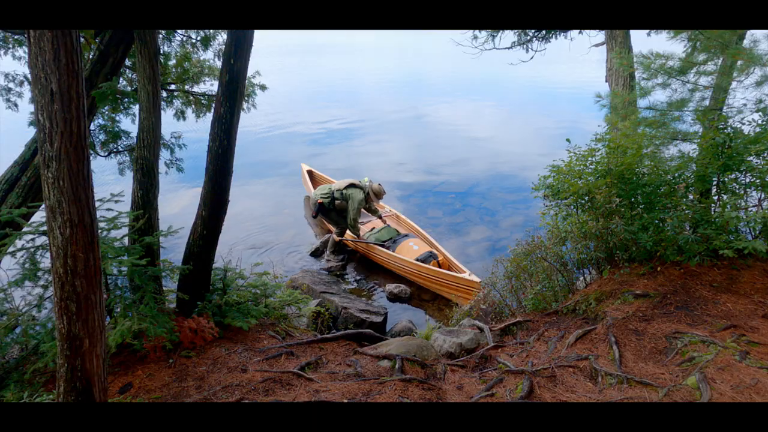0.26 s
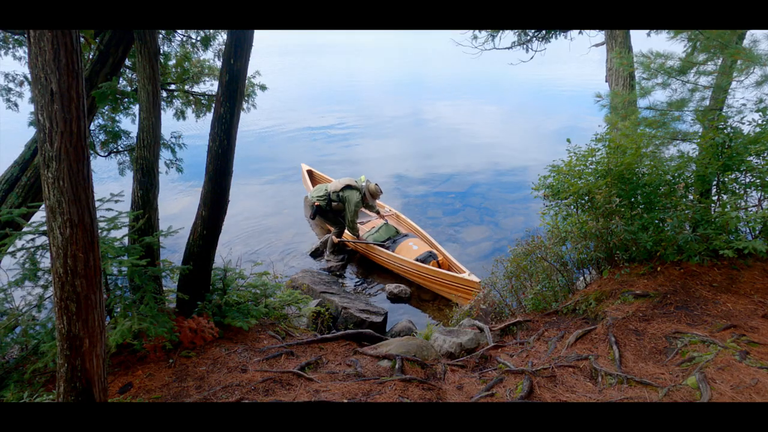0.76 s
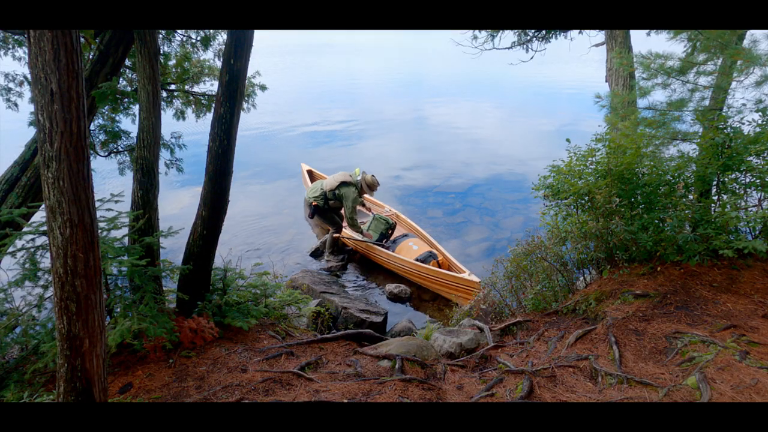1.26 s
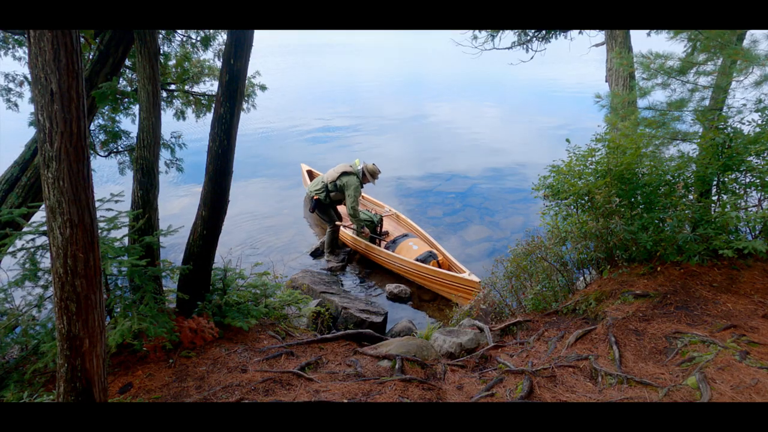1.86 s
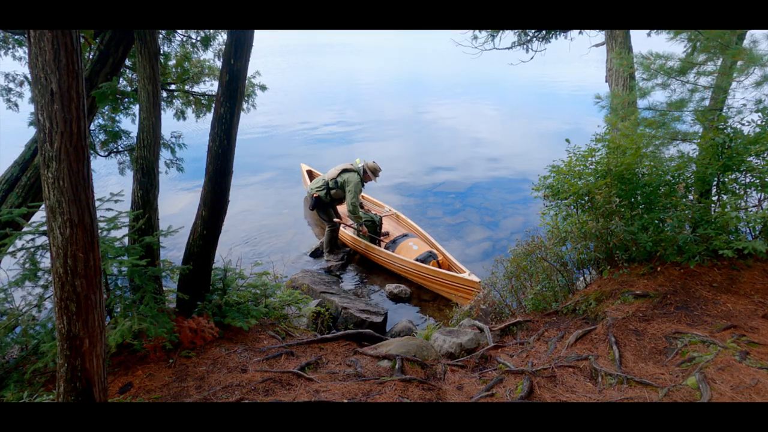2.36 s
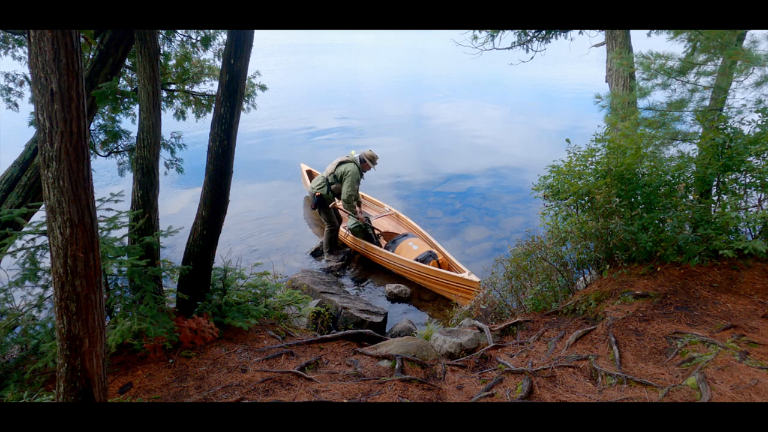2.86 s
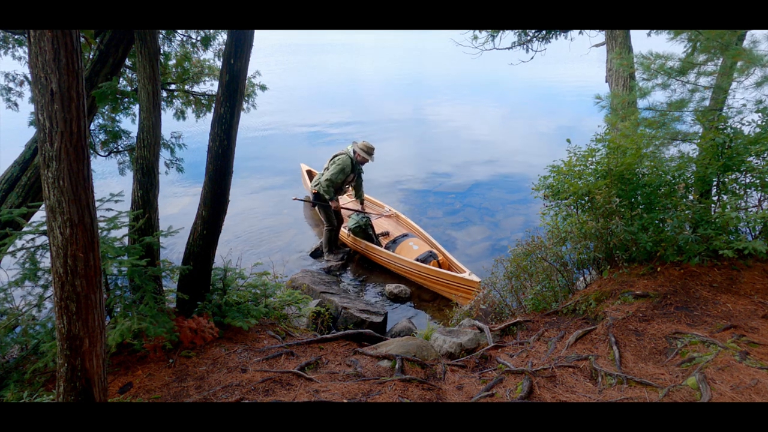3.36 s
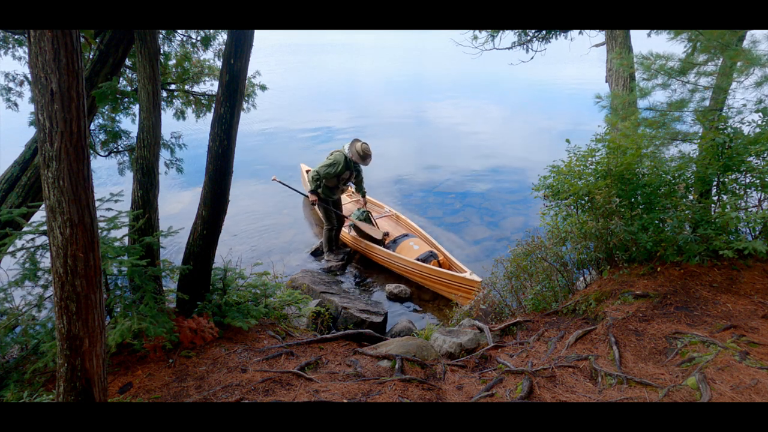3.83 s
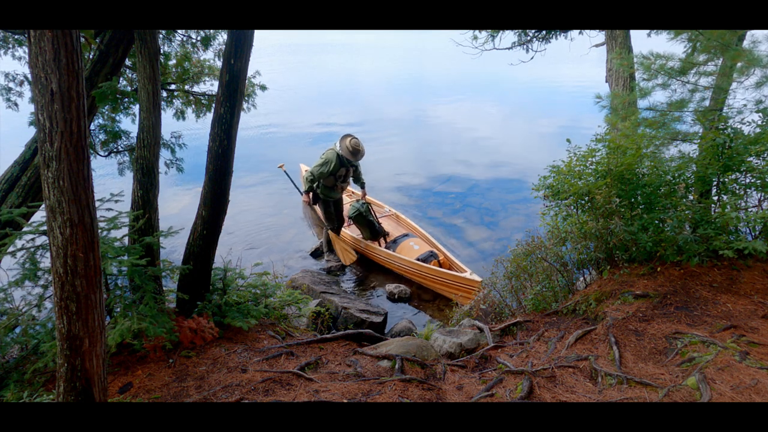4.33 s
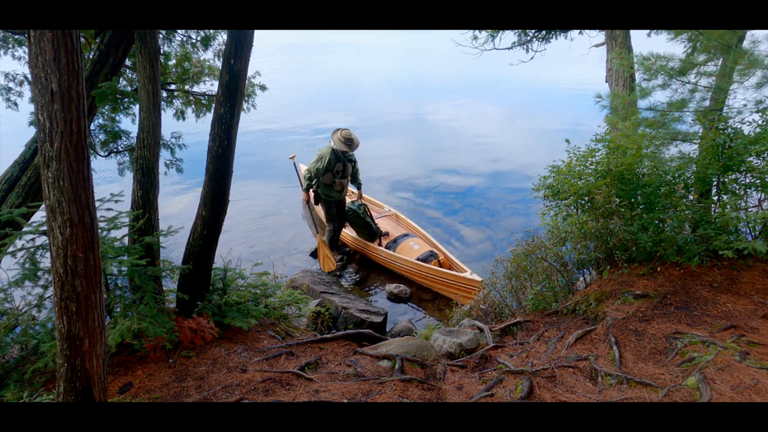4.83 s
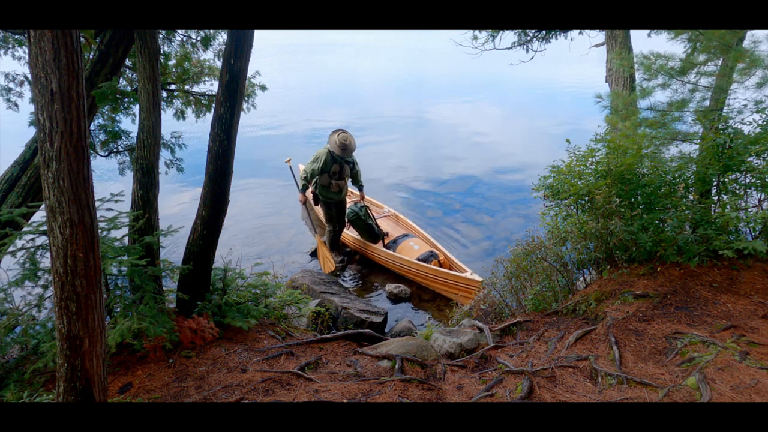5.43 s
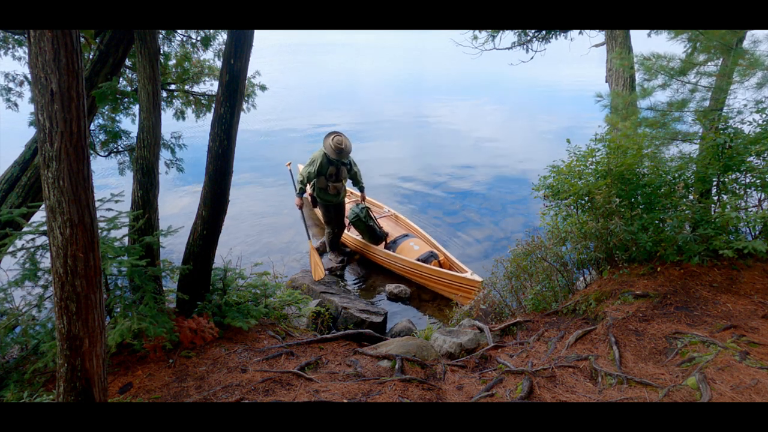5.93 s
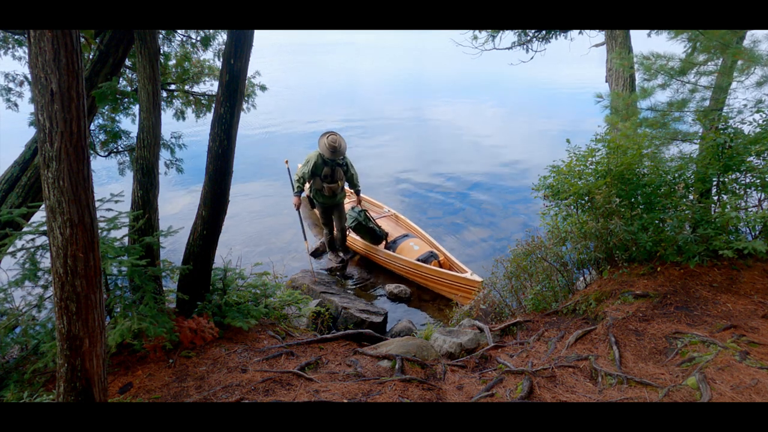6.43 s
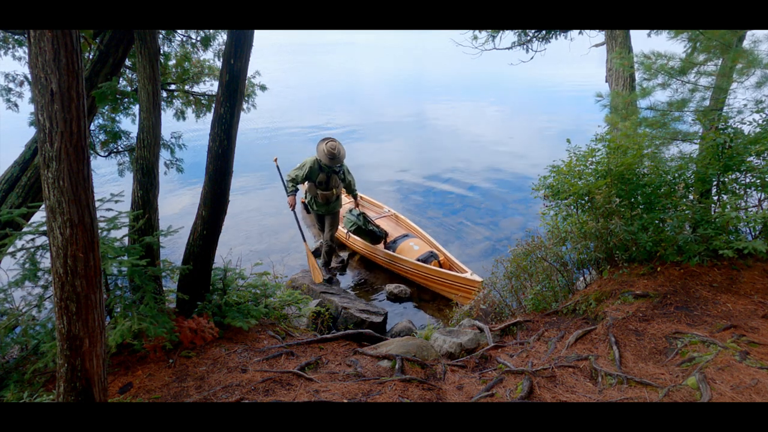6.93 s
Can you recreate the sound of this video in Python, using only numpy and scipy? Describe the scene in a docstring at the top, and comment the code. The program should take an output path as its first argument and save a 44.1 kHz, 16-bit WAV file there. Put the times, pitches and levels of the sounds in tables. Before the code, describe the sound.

A soft pack drags and thuds over the ribs of a wooden canoe, hard knocks ring the hull, buckles click, then a paddle taps stone by a quiet lake.

```python
"""By the rocks of a calm lake, a nylon pack is dragged over the ribs of a wooden canoe.
Knocks and bumps are bending-wave chirps that ring the hull; rubbing is stick-slip grains through that ring.
A paddle on stone, buckles and drips are damped sines; nylon, thin whistling and ticks are shaped noise.
Behind: a cut from one place's faint hiss to another's far rush, low rumble puffs, one microphone thump."""
import sys
import numpy as np
from scipy import signal
from scipy.fft import rfft, irfft, next_fast_len
from scipy.io import wavfile
from scipy.ndimage import map_coordinates

SR = 44100
rng = np.random.default_rng(int(sys.argv[2]) if len(sys.argv) > 2 else 0)


def put_to_file(sound):
    """Save the sound as 16-bit audio at rate SR, in the file named by the first command-line argument."""
    columns = np.atleast_2d(sound).T  # one column per channel
    safe = np.clip(columns, -1, 1)
    whole_steps = np.round(safe * 32767)
    wavfile.write(sys.argv[1], SR, whole_steps.astype(np.int16))


N = 317079
T = np.arange(SR // 2) / SR  # time axis of a short sound, s
HZ = np.fft.rfftfreq(SR, 1 / SR)


def amp(db):
    """Decibels to gain."""
    return 10 ** (np.asarray(db) / 20)


def unit(x):
    """Scale to rms 1."""
    return x / np.sqrt(np.mean(x ** 2) + 1e-20)


def along(points, hz):
    """Interpolate (Hz, value) points on a log frequency axis."""
    f, v = np.transpose(points)
    return np.interp(np.log(hz + 1), np.log(f + 1), v)


def curve(rows):
    """(s, value) rows as one value per sample."""
    return np.interp(np.arange(N) / SR, *np.transpose(rows))


def wobble(rate):
    """A smooth random curve, rate knots a second."""
    knots = rng.standard_normal(int(N * rate / SR) + 4)
    return map_coordinates(knots, [np.arange(N) * rate / SR])


def noise_burst(t60):
    """White noise dying by 60 dB in t60 seconds."""
    return amp(-60 * T / t60) * rng.standard_normal(len(T))


def filtered(x, response):
    """x times a complex response of frequency."""
    m = next_fast_len(N + SR // 2)
    return irfft(rfft(x, m) * response(np.fft.rfftfreq(m, 1 / SR)), m)[..., :N]


def coloured(x, spectrum):
    """A steady sound filtered by (Hz, dB) points, at rms 1."""
    return unit(filtered(x, lambda hz: amp(along(spectrum, hz))))


def struck(x, db):
    """A short sound through the causal minimum-phase filter with these dB on the HZ grid."""
    cepstrum = irfft(np.log(amp(db)))
    cepstrum[1:SR // 2] *= 2
    cepstrum[SR // 2 + 1:] = 0
    return irfft(rfft(x, SR) * np.exp(rfft(cepstrum)))[:len(T)]


def add(track, s, sound):
    """Mix a sound in at time s."""
    room = track[round(s * SR):][:len(sound)]
    room += sound[:len(room)]


def at_level(x, db):
    """Give a hit the energy of 50 ms at this rms level."""
    return amp(db) * x * np.sqrt(.05 * SR / np.sum(x ** 2))


def ring(modes, scatter_db, detune):
    """Damped sines, at new strengths and slightly new pitches for every blow."""
    hz, db, t60 = np.transpose(modes)[:, :, None]
    size, pitch = rng.standard_normal((2, len(modes), 1))
    sign = (-1) ** np.arange(len(modes))[:, None]
    decay = amp(db + scatter_db * size - 60 * T / t60)
    sines = np.sin(2 * np.pi * hz * (1 + detune * pitch) * T)
    return np.sum(sign * decay * sines, axis=0)


def grains(rate, spread_db):
    """Tiny slips at random moments and of random sizes, at rms 1."""
    chance, size, sign = rng.random(N), rng.standard_normal(N), rng.choice([-1, 1], N)
    return unit((chance < rate / SR) * amp(spread_db * size) * sign)


def swells(start, length, db, rise_db_per_s, fall_db_per_s):
    """Gain of overlapping gestures: each rises to its level, holds for its length and falls away."""
    t = np.arange(0, N + 64, 64)[:, None] / SR
    rise_db = rise_db_per_s * np.maximum(start - t, 0)
    fall_db = fall_db_per_s * np.maximum(t - start - length, 0)
    each = amp(db - rise_db - fall_db)
    return curve(np.c_[t, np.linalg.norm(each, axis=1)])


def pair(spectrum, alike):
    """Stereo noise of rms 1 with a given likeness of the two sides."""
    turn = lambda hz: np.arccos(np.clip(along(alike, hz), -1, 1)) / 2
    share = lambda hz: amp(along(spectrum, hz)) * [np.cos(turn(hz)), np.sin(turn(hz))]
    mid, side = filtered(rng.standard_normal((2, N)), share)
    return unit(np.array([mid + side, mid - side]))


# Spectrum of a blow on the planking. Each row: frequency in Hz, relative level in dB.
PLANK = [(40, -22), (100, -3.5), (180, 0.5), (300, 4), (400, -4.5), (500, -7), (780, -14.5), (1000, -7.5),
         (1300, -14), (1650, -25.5), (2000, -29.5), (2500, -27), (5200, -37), (7500, -50.5), (14000, -67)]
# Hard gear on the hull. Each row: start in seconds, level in dB, knock in dB, lower edge of the knock in Hz,
# crack in the treble in dB, travel time of the bending wave at 250 Hz in seconds, ring gain in dB,
# pitch of the struck panel in Hz, place along the hull 0-1.
KNOCKS = [(1.9121, -24, -2.5, 610, 1, .021, -2, 161, 0.5), (2.113, -22, 5, 540, 9.5, 0.018, 2, 190, 0.3),
          (2.738, -21, 9.5, 500, 5, 0.003, -3.5, 171.4, 0.36),
          (3.154, -22.5, 12, 1100, 19, 0.00553, 1.5, 296, .085),
          (3.6377, -33.5, 8.5, 1010, 0.5, 0.0047, 2, 277, 0.01)]
# Soft pack or boot on the ribs. Each row: start in seconds, level in dB, hardness in dB, panel pitch in Hz.
BUMPS = [(1.257, -42, 7, 234), (1.409, -31.5, 8.5, 309), (1.433, -35, 5, 238), (1.468, -25, 1, 227.6),
         (1.498, -29.5, -1, 303), (1.516, -29.5, 1, 222), (1.547, -27, -28.5, 231.4),
         (1.574, -35, 5.5, 330), (1.603, -29.5, 9.5, 258), (1.635, -31, 1, 360.6), (1.674, -29.5, 2.5, 268),
         (1.722, -29, 0.5, 229), (1.747, -35, 6.5, 298), (1.774, -35, -16, 142), (1.819, -34.5, -1.5, 185),
         (1.874, -33, 2.5, 314), (1.927, -24, -17.5, 164.3), (1.958, -29.5, -23, 218),
         (2.026, -40, -18, 128), (2.413, -34.5, -21, 141.6), (3.47, -52.5, -32, 200),
         (5.474, -49.5, -19, 244), (5.82, -51.5, -14, 154)]
BUMP_EDGE_HZ, BUMP_MUFFLE_DB = 570, -1.5  # lower edge of the knock; padding's effect on the crack
BUMP_TRAVEL_S, BUMP_RING_DB = 0.006413, 4  # travel time at 250 Hz; ring gain
BUMP_DAMPING_DB_PER_S = 106.5  # the padding stays on the planks; adds to their own decay
KNOCK_PANEL_DB, BUMP_PANEL_DB = -45, -35  # panel note before the ring gain
PANEL_T60_S = 0.16  # without padding


def knocks():
    """Each blow sends a falling chirp through the planks; the struck panel and the whole hull ring behind."""
    out = np.zeros(N)
    hits = [(*row, KNOCK_PANEL_DB, 0) for row in KNOCKS]
    for s, db, hard_db, hz in BUMPS:
        hits.append((s, db, hard_db, BUMP_EDGE_HZ, hard_db + BUMP_MUFFLE_DB, BUMP_TRAVEL_S, BUMP_RING_DB,
                     hz, rng.random(), BUMP_PANEL_DB, BUMP_DAMPING_DB_PER_S))
    for s, db, knock_db, knock_hz, crack_db, travel, ring_db, panel_hz, place, panel_db, damping in hits:
        hardness = along([(330, 0), (knock_hz, knock_db), (1200, knock_db), (1600, crack_db)], HZ)
        panel = amp(panel_db - 60 * T / PANEL_T60_S) * np.cos(2 * np.pi * panel_hz * T)
        ringing = signal.fftconvolve(panel + hull_ring(place), bending_wave(travel))[:len(T)]
        wave = contact(travel) + amp(ring_db - damping * T) * ringing
        add(out, s, at_level(struck(wave, along(PLANK, HZ) + hardness), db))
    return out


def contact(travel, grit_db=-21, grit_t60=0.034, grit_rise=0.00054):
    """A blow's lows are one clean bending wave; its treble is a brief crunch arriving with the wave's front."""
    clean = 1 / (1 + (HZ / 2800) ** 4)
    front = np.exp(-2j * np.pi * HZ * travel * np.sqrt(250 / 2800))
    grit = amp(grit_db) * (1 - np.exp(-T / grit_rise)) * noise_burst(grit_t60)
    lows = clean * rfft(bending_wave(travel), SR)
    return irfft(lows + (1 - clean) * front * rfft(grit, SR))[:len(T)]


def bending_wave(travel):
    """A pulse spread by a thin plate: speed grows with the root of frequency, so the treble arrives first."""
    return irfft(np.exp(-4j * np.pi * travel * np.sqrt(250 * HZ)))[:len(T)]


# Hull modes, by number of half-waves along the boat. Each row: frequency in Hz, relative level in dB.
HULL = [(134, 0.5), (167, -1), (189, 1), (230, -1), (265, 0), (304, -3.5), (361, -0.5), (400, 4),
        (450, 0.5), (565, 2.5), (646, 6), (705, 4), (813, -1.5), (900, 0), (958, -1), (1015, -2.5),
        (1075, -5), (1163, -5.5), (1290, -6), (1425, 3), (2000, -1)]
# Decay of the freely ringing hull. Each row: frequency in Hz, t60 in seconds.
HULL_DECAY = [(150, .44), (300, .31), (600, .17), (1000, .14), (3000, .06), (9000, .05)]


def hull_ring(place, modes_db=-47, dense_db=-31.5, build=0.005):
    """Waves return from stems and gunwales, building main modes, weak where place is a node, and a dense bed."""
    hz, t, z = signal.stft(rng.standard_normal(len(T)), SR, nperseg=256)
    decay = amp(-60 * t / along(HULL_DECAY, hz)[:, None])
    dense = signal.istft(z * decay, SR, nperseg=256)[1][:len(T)]
    mode_hz, mode_db = np.transpose(HULL)
    half_waves = 3 + np.arange(len(HULL))
    place_db = 10 * np.log10(np.sin(np.pi * half_waves * place) ** 2 + .12)
    rows = np.c_[mode_hz, mode_db + place_db, along(HULL_DECAY, mode_hz)]
    modes = ring(rows, scatter_db=1.5, detune=.005)
    return (amp(modes_db) * modes + amp(dense_db) * dense) * (1 - np.exp(-T / build))


# The rubbed hull. Each row: frequency in Hz, relative level in dB.
GROAN = [(60, -11.5), (110, -16), (170, 4), (240, 0), (330, 1.5), (470, -12.5), (680, -14.5), (820, -17.5),
         (1050, -15.5), (1600, -18.5), (3000, -59), (6000, -87)]
# Long drag of the pack over the ribs. Each row: time in seconds, effort in dB (groan level before the shoves).
DRAG = [(.7, -71.5), (.84, -64), (.9, -53), (1.2, -48.5), (1.34, -44), (1.42, -35.5), (1.6, -36),
        (1.82, -34.5), (1.89, -28.5), (2.02, -39.5), (2.25, -50.5), (2.5, -84)]
# Lifts, shifts and steps; also played by rustle(). Each row: start in seconds, length in seconds,
# rub in dB and rustle in dB (both before random variation), brightness in dB (treble over low rustle gain).
MOVES = [(1.063, 0.044, -48, -63.5, -17), (2.311, 0.16, -39, -57, -1), (2.607, 0.14, -42, -47.5, -3.5),
         (2.921, 0.043, -44, -60.5, -15), (2.977, 0.22, -66, -63, -3), (3.425, 0.093, -66, -62.5, -6),
         (3.782, 0.062, -55, -65, -9.5), (3.895, 0.19, -51, -70, -10.5), (4.67, 0.043, -71, -67, -3),
         (4.84, 0.34, -57, -68.5, -6), (5.23, 0.34, -60.5, -69.5, -9.5), (5.727, 0.27, -59.5, -69, 0),
         (5.825, 0.11, -56, -64.5, -8), (6.034, 0.34, -58.5, -69, -3), (6.472, 0.15, -67, -73, 2.5),
         (6.678, 0.27, -65.5, -89, 10.5), (6.955, 0.32, -59, -73.5, -3.5)]
RUB_RISE_DB_PER_S, RUB_FALL_DB_PER_S = 212, 218


def rubbing():
    """Gear sticks and slips on the ribs in uneven shoves; pressing on the planks, it damps their ringing."""
    slips = grains(rate=700, spread_db=3)
    damped = hull_ring(rng.random()) * amp(-60 * T / .16)
    groan = coloured(signal.fftconvolve(slips, damped)[:N], GROAN)
    shoves_db = 1.2 * wobble(28)
    start, length, rub_db, _, _ = np.transpose(MOVES)
    moves = swells(start, length, rub_db, RUB_RISE_DB_PER_S, RUB_FALL_DB_PER_S)
    return np.hypot(amp(curve(DRAG)), moves) * amp(shoves_db) * groan


# Sliding nylon. Each row: frequency in Hz, relative level in dB.
NYLON = [(500, 13), (1500, 10), (2100, 5.5), (2550, 9.5), (3400, 7), (4100, -2), (4700, 4.5), (5450, 1.5),
         (6200, -8), (7200, -5), (9000, -13.5), (12500, -22.5), (15000, -59)]
# Short gritty scuffs. Each row: start in seconds, relative level in dB, relative brightness in dB.
SCUFFS = [(1.236, -35.5, -10.5), (1.258, -47.5, -7), (1.471, -37.5, -3.5), (1.507, -41, -3),
          (1.5725, -32, -6), (1.6065, -33, -2), (1.6784, -41, -10), (1.827, -44.5, -10),
          (1.876, -36.5, -1.5), (2.529, -44.5, 2), (2.656, -37, -2), (2.8714, -43.5, -16),
          (3.332, -55.5, 2), (4.646, -63, 14), (4.798, -55, -4), (5.221, -56, 9.5), (5.5767, -65.5, 17.5),
          (5.828, -52.5, 6), (6.039, -42.5, 1), (6.064, -50, 0)]
DRAG_HISS_DB, DRAG_HISS_GROWS = -30, 0.72  # low hiss gain at 0 dB of effort; dB of hiss per dB of effort
DRAG_BRIGHT_DB = -14  # treble gain over low gain: a dull hiss
RUSTLE_RISE_DB_PER_S, RUSTLE_FALL_DB_PER_S = 123.5, 151


def rustle():
    """Nylon slides as a fine hiss full of crinkles, low and treble swelling apart; scuffs are sudden bursts."""
    scuff_low, scuff_high = np.zeros((2, N))
    for s, db, bright_db in SCUFFS:
        burst = amp(db - 3 - 60 * T / 0.07) * (1 - np.exp(-T / 0.0003))
        add(scuff_low, s, burst)
        add(scuff_high, s, amp(bright_db - 10) * burst)
    start, length, _, db, bright_db = np.transpose(MOVES)
    drag = amp(DRAG_HISS_DB + DRAG_HISS_GROWS * curve(DRAG))
    moves_low = swells(start, length, db, RUSTLE_RISE_DB_PER_S, RUSTLE_FALL_DB_PER_S)
    moves_high = swells(start, length, db + bright_db, RUSTLE_RISE_DB_PER_S, RUSTLE_FALL_DB_PER_S)
    low = np.hypot(drag, moves_low)
    high = np.hypot(amp(DRAG_BRIGHT_DB) * drag, moves_high)
    crinkles = grains(rate=600, spread_db=5.5)
    weave = coloured(rng.standard_normal(N) + amp(-2) * crinkles, NYLON)
    dull = filtered(weave, lambda hz: 1 / (1 + (hz / 4200) ** 6))
    catches = amp(1.1 * wobble(55))
    low_part = np.hypot(catches * low, scuff_low) * unit(dull)
    high_part = np.hypot(catches * high, scuff_high) * unit(weave - dull)
    return low_part + high_part


# Paddle on stone. Each row: start in seconds, level in dB, share of low bending modes in dB, treble in dB.
TAPS = [(4.866, -52, -11.5, -11), (6.01, -38.5, 10, 7), (6.0142, -37, -0.5, -0.5), (6.12, -62, -18, 1)]
# Paddle modes. Each row: frequency in Hz, relative level in dB, t60 in seconds.
PADDLE = [(178, -0.5, 0.068), (340.3, 3.5, 0.34), (435.4, 2, 0.2), (930, 0, 0.18), (988, 3, 0.071),
          (1090, 6, 0.089), (1460, -1, 0.051), (1730, -4, 0.067), (2020, -3, 0.11), (2120, -2, 0.037),
          (2300, -9, 0.045), (2990, -6, 0.075)]


def paddle():
    """The paddle meets stone: a gritty crack and the bending modes of shaft and blade."""
    out = np.zeros(N)
    for s, db, low_db, high_db in TAPS:
        modes = ring(PADDLE, scatter_db=1.5, detune=.002)
        crack = amp(3) * noise_burst(.06)
        touch = along([(500, low_db), (950, 0), (1200, 0), (1900, high_db), (3100, high_db),
                       (3700, high_db - 14), (12000, high_db - 33)], HZ)
        add(out, s, at_level(struck(modes + crack, touch), db))
    return out


# Buckles and strap ends. Each row: start in seconds, level in dB (7 below peak), relative bright ring in dB.
CLICKS = [(0.314, -63, -18), (2.063, -47, -29.5), (2.165, -56, -28), (2.191, -48, -27),
          (2.2753, -49.5, -22), (2.32, -52, -39), (2.328, -48, -9), (2.3436, -42, -6),
          (2.362, -38.5, -14.5), (2.441, -41, -16), (2.4485, -39.5, -10), (2.46, -46, -11),
          (2.4785, -52, -17), (2.495, -46, -18), (2.794, -45, -30), (2.8044, -47, -20), (2.8394, -43.5, -6),
          (2.9667, -52, -12), (3.1143, -50.5, -20), (3.642, -58, -14), (3.65, -56.5, -13),
          (4.114, -62, -14), (4.126, -55, -10), (4.265, -60, -6), (4.701, -54, -31), (5.7154, -55, -28)]
# Buckle modes. Each row: frequency in Hz, relative level in dB, t60 in seconds.
BUCKLE = [(2650, -4, 0.028), (4680, 3, 0.022), (5200, 4, 0.02), (7100, -1, 0.012), (8730, 1, 0.02),
          (10400, -5, 0.012)]
CHATTER_T60_S = 0.011


def buckles():
    """Small hard fittings chatter for a few milliseconds and ring at nearly the same pitches each time."""
    out = np.zeros(N)
    for s, db, bright_db in CLICKS:
        modes = ring(BUCKLE, scatter_db=3, detune=.012)
        chatter = noise_burst(CHATTER_T60_S)
        ringing = unit(signal.fftconvolve(modes, chatter)[:len(T)])
        click = ringing + amp(-1) * unit(noise_burst(.032))
        tone = [(600, -28.5), (2500, -0.5), (5400, -0.5), (8500, bright_db + 12), (14000, bright_db - 4.5)]
        click = struck(click, along(tone, HZ))
        add(out, s, amp(db + 7.0) * click / np.abs(click).max())
    return out


# Thin whistling in the rustle. Each row: start in seconds, length in seconds, level in dB, mean pitch in Hz.
WHISTLES = [(2.59, 0.13, -52, 5350), (2.616, 0.08, -52, 3320), (4.665, 0.051, -66.5, 2230),
            (5.72, 0.17, -69.5, 5060)]
WHISTLE_WIDTH_HZ, WHISTLE_WAVER = 450, .014  # bandwidth; random pitch waver as a share of the pitch


def whistles():
    """Narrow-band whistling within the rustle: noise around a pitch that wavers at random."""
    out = np.zeros(N)
    for s, length, db, hz in WHISTLES:
        phase = 2 * np.pi * np.cumsum(hz * (1 + WHISTLE_WAVER * wobble(30))) / SR
        band = unit(wobble(WHISTLE_WIDTH_HZ) * np.sin(phase) + wobble(WHISTLE_WIDTH_HZ) * np.cos(phase))
        out += swells(s, length, db, RUB_RISE_DB_PER_S, RUB_FALL_DB_PER_S) * band
    return out


# Dry ticks of twigs, pebbles and drops. Each row: start in seconds, peak in dB, centre in Hz.
TICKS = [(0.293, -57, 2670), (0.315, -59, 2620), (0.6524, -54, 2950), (0.743, -58, 12500),
         (3.592, -60, 3200), (4.2183, -65, 2610), (4.4732, -59, 12000), (4.583, -56, 7000),
         (4.867, -47, 2700), (6.209, -55, 5500), (6.486, -52, 6200), (6.618, -54, 2800)]
TICK_T60_S, TICK_SKIRT_DB_PER_OCTAVE = 0.023, 22  # decay; spectral fall either side of the centre


def ticks():
    """A tiny hard contact: a few milliseconds of noise around one pitch."""
    out = np.zeros(N)
    for s, db, hz in TICKS:
        skirt_db = -TICK_SKIRT_DB_PER_OCTAVE * np.abs(np.log2((HZ + 20) / hz))
        tick = struck(noise_burst(TICK_T60_S), skirt_db)
        add(out, s, amp(db) * tick / np.abs(tick).max())
    return out


# Water drops. Each row: start in seconds, mid pitch of the bubbles in Hz, level of each bubble in dB.
DRIPS = [(3.796, 3020, -65), (3.815, 2980, -60), (3.875, 3100, -62), (3.95, 3080, -69)]


def drips(count=4):
    """Each drop's splash traps a few tiny bubbles whose pitch rises as they die away."""
    out = np.zeros(N)
    for s, hz, db in DRIPS:
        for late, size in rng.random((count, 2)):
            bubble_hz = hz * (.88 + .24 * size)
            bubble = np.sin(2 * np.pi * bubble_hz * T * (1 + 2 * T))
            add(out, s + 0.0033 * late, amp(db - 60 * T / 0.037) * bubble)
    return out


# Bump on the microphone. Each row: start in seconds, level in dB before panning, travel time at 250 Hz in seconds.
NUDGE = [(5.4106, -36, 0.00162)]
# Its spectrum. Each row: frequency in Hz, relative level in dB.
THUMP = [(15, -1), (45, 8.5), (100, 0.5), (240, -0.5), (400, -8.5), (700, -13.5), (1200, -17.5),
         (2000, -33.5), (5000, -52), (11000, -56), (14000, -82)]


def nudge():
    """A dry, ringless thump right at the microphone, stronger on the right."""
    out = np.zeros(N)
    for s, db, travel in NUDGE:
        add(out, s, at_level(struck(bending_wave(travel), along(THUMP, HZ)), db))
    return out * amp([[-4], [3]])


# Far rush over open water. Each row: frequency in Hz, relative level in dB.
LAKE = [(30, -18), (90, -16), (170, 5.5), (300, -0.5), (600, -2), (850, 2), (1100, 6), (1400, 0.5),
        (1900, -12.5), (2700, -22), (3900, -34), (5200, -24.5), (7500, -27), (13000, -42)]
# Its level. Each row: time in seconds, level in dB.
RUSH = [(.3, -54), (2, -53.5), (4.3, -56.5), (5.5, -57.5), (6.6, -60), (7.19, -58)]
# Its left-right likeness. Each row: frequency in Hz, likeness 0-1.
ALIKE = [(60, 0.67), (200, 0.83), (1300, 0.78), (2400, 0.2), (7000, 0.74), (15000, 0.3)]
# Its balance. Each row: frequency in Hz, left over right in dB.
LAKE_LEFT = [(380, -0.6), (700, 3.5), (1290, 3.5), (2380, 0.5), (4400, 1)]
# Air among the trees. Each row: frequency in Hz, relative level in dB.
TREES = [(59, 12.5), (100, -27), (143, -5), (200, -2), (814, -14), (1700, -4.5), (1840, -11.5), (5720, -10),
         (11700, -28.5), (15000, -43)]
CUT_S = 0.246  # cut from the faint hiss among the trees to the far rush over the lake
# Low rumble at the microphone. Each row: frequency in Hz, relative level in dB.
RUMBLE = [(15, 0.5), (33, -1), (60, -7.5), (100, -8), (200, -42), (500, -82)]
# Its puffs. Each row: start in seconds, length in seconds, level in dB before random variation and panning.
PUFFS = [(0.26, 0.13, -48), (0.64, 0.025, -52), (1.12, 0.088, -44.5), (1.52, 0.5, -36.5),
         (2.318, 0.047, -31), (2.45, 0.41, -52.5), (3.245, 0.046, -44), (4.555, 1.3, -68.5),
         (6.25, 0.059, -57.5), (7.02, 0.17, -71)]
PUFF_RISE_DB_PER_S, PUFF_FALL_DB_PER_S = 116, 132
CALM_DB = -83.5  # rumble floor, on the same scale as the puffs


def air():
    """Noise layers: one place's faint hiss, cut to another's far rush, mostly left; low rumble puffs under both."""
    lake_gain = curve([(CUT_S - .015, 0), (CUT_S + 0.0098, 1)])
    trees_gain = curve([(CUT_S - .005, 1), (CUT_S + .005, 0)])
    balance = lambda hz: amp(along(LAKE_LEFT, hz) * np.array([[.5], [-.5]]))
    lake = amp(curve(RUSH)) * filtered(pair(LAKE, ALIKE), balance)
    trees = amp(-61.0) * pair(TREES, [(1000, 0.46)]) * amp([[-1.5], [1.5]])
    puffs = amp(CALM_DB) + swells(*np.transpose(PUFFS), PUFF_RISE_DB_PER_S, PUFF_FALL_DB_PER_S)
    low_noise = pair(RUMBLE, [(50, 0.79)]) * amp([[-1.2], [1.2]])
    rumble = puffs * amp(1.1 * wobble(23.01)) * low_noise
    return lake_gain * lake + trees_gain * trees + rumble


# Phase between the microphone ports. Each row: frequency in Hz, lead of the left port in radians.
LEAD = [(300, -0.046), (800, -0.25), (1500, -1.35), (2100, 0.94), (3270, -1.05), (4300, -0.33),
        (11000, -0.43), (12500, 0.7)]


def scene():
    """The boat's sounds reach both ports with a small phase offset; the wooded shore scatters a little back."""
    boat = knocks() + rubbing() + paddle() + buckles() + rustle() + whistles() + ticks() + drips()
    direct = filtered(boat, lambda hz: np.exp(.5j * along(LEAD, hz) * np.array([[1], [-1]])))
    tail = rng.standard_normal((2, len(T))) * amp(-60 * T / 0.23) * (1 - np.exp(-T / 0.017))
    scattered = filtered(boat, lambda hz: hz / (hz + 700))  # little bass comes back
    shore = signal.fftconvolve(scattered[None], tail / np.linalg.norm(tail[0]), axes=1)[:, :N]
    return direct + amp(-23.0) * shore + nudge() + air()


TOP_HZ = 14600


def record(dry):
    """Cut steeply above the band limit."""
    return filtered(dry, lambda hz: 1 / (1 + (hz / TOP_HZ) ** 60))


dry = scene()
out = record(dry)
put_to_file(out)
```